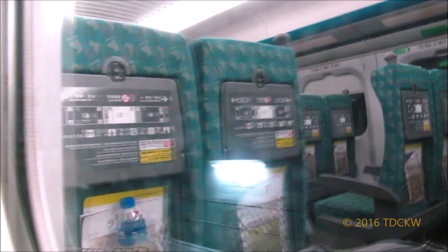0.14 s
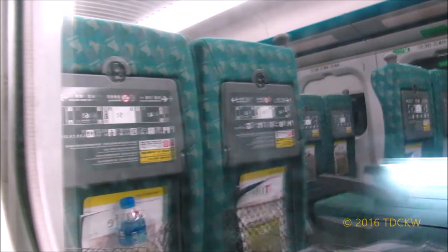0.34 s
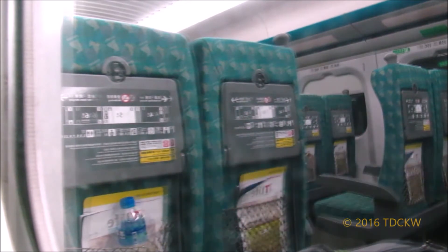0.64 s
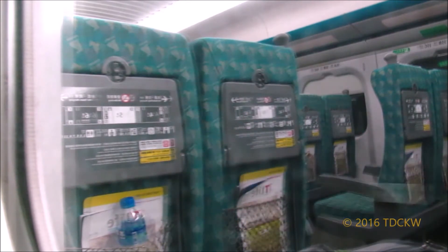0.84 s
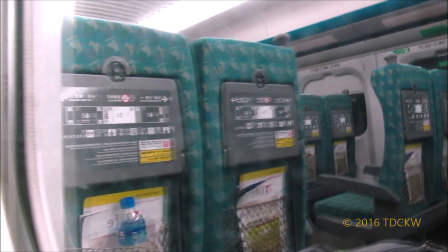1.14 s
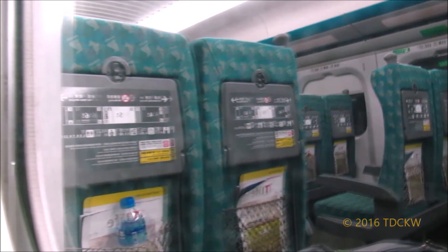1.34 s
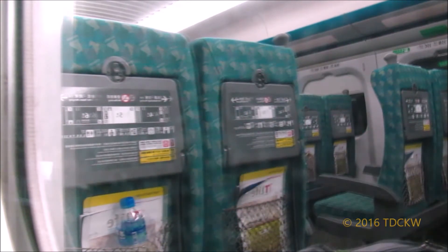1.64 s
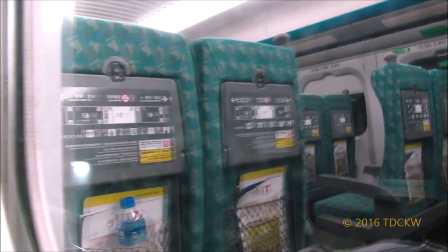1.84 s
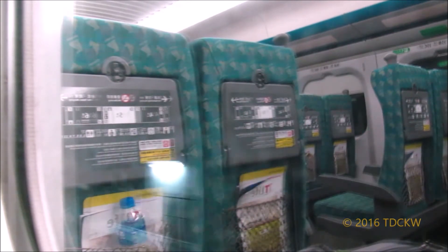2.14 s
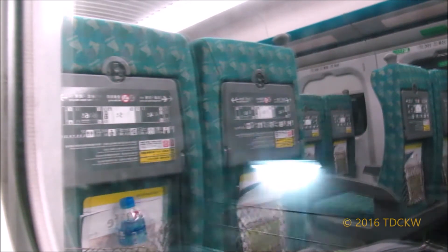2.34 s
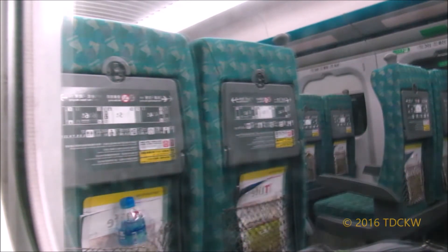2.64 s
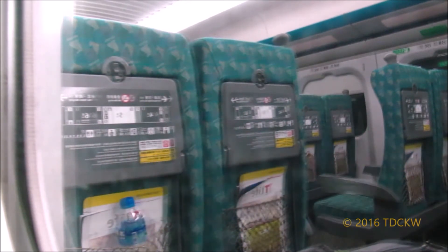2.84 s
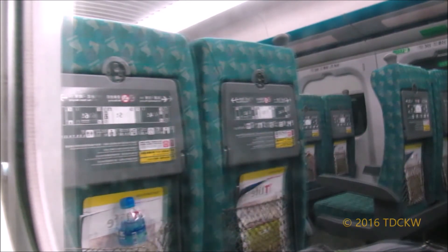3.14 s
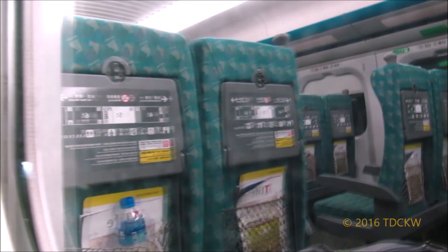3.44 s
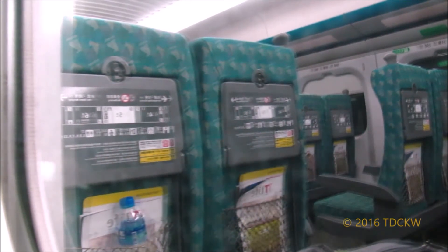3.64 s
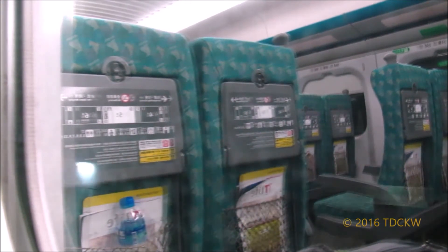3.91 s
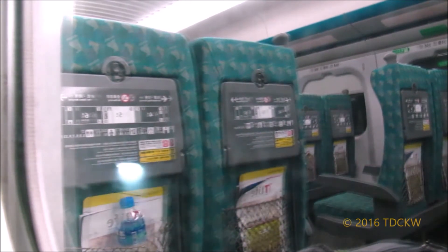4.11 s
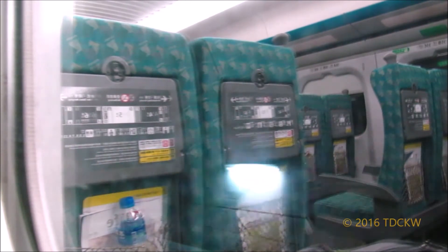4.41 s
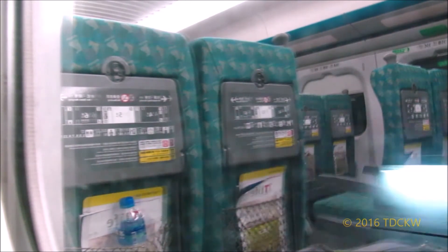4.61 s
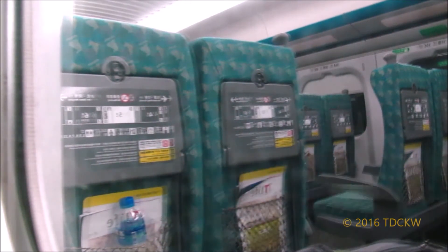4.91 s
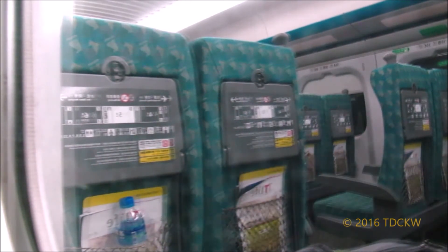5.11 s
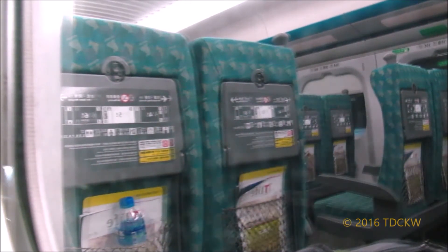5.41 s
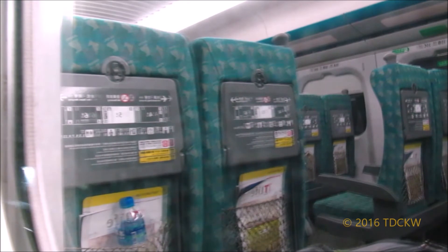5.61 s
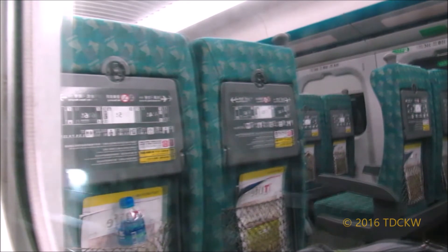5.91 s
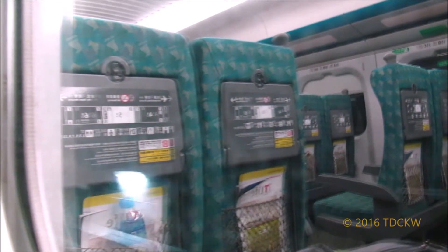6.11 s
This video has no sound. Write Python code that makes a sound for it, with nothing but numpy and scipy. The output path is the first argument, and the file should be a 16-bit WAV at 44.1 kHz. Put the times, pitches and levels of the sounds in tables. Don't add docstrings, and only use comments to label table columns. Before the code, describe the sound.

Continuous train interior noise from start to end, with no distinct events. Bassy wheel and rail rumble fills the car, a wavering hum-like whine sings steadily above it, and muffled tunnel wind churns behind. Faint panel resonances and soft vent hiss complete the bed. The low-quality compressed pickup keeps losing its high end for split seconds, leaving faint glassy chirps.

```python
import sys
import numpy as np
from scipy import signal
from scipy.io import wavfile
from scipy.ndimage import uniform_filter1d

SR = 44100
rng = np.random.default_rng(int(sys.argv[2]) if len(sys.argv) > 2 else 0)


def volts_from_db(level):
    exponent = np.asarray(level, float) / 20
    return 10 ** exponent


def to_wav(s):
    ch = np.atleast_2d(s).T
    pcm = np.round(np.clip(ch, -1, 1) * 32767)
    wavfile.write(sys.argv[1], SR, pcm.astype(np.int16))


N = 276142

# f/Hz, level/dB per Hz
RUMBLE = [(7.1, -39.5), (12, -7.5), (27, -16), (48, -1), (65, -1), (86, -8), (117, -0.5), (149, -6),
          (240, -4), (289, -10), (361, -11.5), (406, -14.5), (700, -21), (910, -55), (1540, -120)]
# t/s, whine level/dB
LOAD = [(0.0, -24), (0.31, -26.5), (0.89, -23), (2.21, -24), (3.43, -21), (3.56, -28), (3.68, -23),
        (4.5, -22), (4.69, -25.5), (5.3, -22), (5.61, -25.5), (6.26, -22.5)]
# multiple of the tooth rate, level/dB against the whine, width/Hz, sideband fall/dB per step
GEAR = [
    (1, -10, 8.8, 2),
    (2, -31.5, 12, 0.6),
]
# t/s, level/dB rms
AXLE = [(0.0, -16), (0.03, -22.5), (3.52, -26), (3.64, -60), (3.7, -33.5), (4.97, -25), (5.28, -40),
        (5.77, -20.5), (5.86, -46), (6.26, -25.5)]
# t/s, level/dB rms
MAINS = [(0.0, -32), (0.14, -24.5), (1.46, -25.5), (1.51, -43), (1.6, -19.5), (2.0, -43), (2.35, -22.5),
         (2.74, -36), (2.81, -25.5), (5.53, -28.5), (5.6, -21), (6.26, -25.5)]
# f/Hz, level/dB rms, width/Hz
PANELS = [
    (29.7, -32, 8.5),
    (99.1, -35, 2.2),
    (176.7, -37, 8.3),
    (232.3, -34.5, 21.4),
    (258.2, -38, 19),
    (363, -40.5, 8.5),
    (2580, -54, 27),
]
# f/Hz, level/dB per Hz
ROAR = [(350, -17.5), (520, -9.5), (700, -13), (1000, -13.5), (1300, -16), (1780, -13.5), (1950, -18.5),
        (2600, -20.5), (2850, -25), (3500, -29.5), (4000, -37), (4300, -38.5), (5200, -64)]
# f/Hz, level/dB per Hz
HISS = [(2500, -43.5), (3600, 0.5), (4200, -2.5), (5000, -3), (6200, -4.5), (7400, -3), (8200, -2.5),
        (9200, -3.5), (10300, -7), (11500, -14.5), (13000, -23.5), (14300, -26), (15000, -38), (15800, -43)]
# f/Hz, width/Hz,
# level/dB against the hiss
SLOTS = [(8580, 180, -16), (8670, 177, -17), (3006, 90, -7.5), (3473, 90, -12.5), (3740, 80, -13.5),
         (4020, 60, -15)]
# t/s, level/dB over the hiss
PUFFS = [
    (0.799, 3.5),
    (1.2, 3.5),
    (1.62, 2.5),
    (4.045, 5),
]
# f/Hz, level/dB over the mean of that bin
SNAP_STEP = [(900, -25), (1080, -6), (1220, 3), (1450, -4), (2700, -3), (3200, 3.5), (3500, 2.5),
             (4050, 2.5), (4300, 7.6), (8300, 7), (8600, 4.5), (9000, 7), (10500, 8), (11500, 20)]
NICKS = [.163, .217, .26, .418, .473, .927, 1.545, 1.652, 1.695, 2.953, 3.21, 3.481, 3.588, 3.7, 3.78,
         3.875, 3.909, 4.127, 4.738, 4.792, 4.877, 4.929, 5.002, 5.279, 5.423, 5.748, 5.795, 5.825, 6.257]
BLANKS = [.109, .557, .663, .961, 1.004, 1.109, 1.497, 2.186, 2.287, 2.334, 2.701, 2.881, 2.988, 3.052,
          3.086, 3.171, 3.308, 4.003, 4.164, 4.278, 4.353, 4.548, 5.15, 5.326, 5.465, 5.603, 5.978, 6.115]
# centre t/s, core/ms, treble level/dB left in the core
STRETCHES = [(.315, 12, -16), (.595, 18, -13), (.764, 8, -14), (1.084, 9, -13), (1.585, 6, -13),
             (1.73, 18, -30), (1.777, 8, -15), (1.858, 19, -25), (2.124, 18, -38), (2.406, 4, -15),
             (2.434, 6, -16), (2.503, 28, -28), (2.587, 38, -38), (2.658, 11, -12), (3.348, 15, -14),
             (3.397, 8, -14), (3.623, 11, -14), (3.75, 9, -16), (3.803, 10, -16), (3.945, 18, -25),
             (4.487, 28, -38), (4.758, 4, -16), (5.04, 8, -16), (5.077, 13, -18), (5.501, 8, -14),
             (5.54, 18, -25), (5.709, 17, -18), (5.906, 9, -14), (6.073, 24, -17)]
# centre t/s, f/Hz, level/dB rms
STRAYS = [(.218, 7435, -52), (.255, 8800, -50.5), (.26, 7700, -48), (.312, 6375, -53), (.589, 4605, -53),
          (1.001, 4865, -52), (1.072, 8530, -53), (1.548, 10185, -54), (1.589, 4175, -50),
          (2.953, 5120, -54), (3.084, 6810, -54), (3.357, 6486, -54), (3.397, 8600, -56),
          (3.583, 8565, -52), (3.629, 8690, -52), (3.701, 7135, -52), (3.741, 6850, -48),
          (3.741, 6650, -49), (3.753, 8140, -48), (3.779, 9180, -53), (3.805, 10080, -55),
          (3.876, 7465, -59), (3.936, 8640, -58), (4.272, 9400, -55), (5.425, 5535, -52),
          (5.506, 7555, -52), (5.608, 8500, -52), (5.702, 8600, -52), (5.907, 8485, -53),
          (5.978, 8660, -55)]

RUMBLE_DB, ROAR_DB, AIR_DB = -22, -31.5, -48
MESH_HZ, SHAFT_HZ = 860, 36.28
CASING_HZ, CASING_WIDTH_HZ, CASING_DB = 866.2, 121, -1.5
CORE_HZ, CORE_WANDER_HZ, CORE_DB = 862.6, 3.944, -31.5
CORE_SLOPE = 2
AXLE_HZ, MAINS_HZ, HUM_WANDER_HZ = 59.53, 120.9, 0.44
SPLIT_HZ, BLOCK_S = 4200, 512 / 48000
NICK_FADE_MS, BLOCK_FADE_MS = 11.3, 21
FAINT_DB, FAINT_SPREAD_DB, FAINT_LOW_HZ, FAINT_HIGH_HZ = -58, 1.5, 4550, 9900
EMPTY_DB = -35
SLOT_SHARE, CORE_MS_PER_STRAY = .25, 14


def evened(x):
    return x / np.sqrt(np.mean(x ** 2) + 1e-20)


def read(points, hz):
    f, value = np.transpose(points)
    return np.interp(np.log(hz + 1), np.log(f + 1), value)


def level_over_time(rows):
    t, db = np.transpose(rows)
    return np.interp(np.arange(N) / SR, t, db)


def add(mix, s, sound):
    start = max(round(s * SR) - len(sound) // 2, 0)
    part = mix[start:][:len(sound)]
    part += sound[:len(part)]


def drift(per_s):
    t = np.arange(0, N + 100, 100) / SR
    rates = np.geomspace(per_s / 10, per_s, 10)
    slow = sum(np.sin(2 * np.pi * (f * t + rng.random())) for f in rates)
    return evened(np.interp(np.arange(N) / SR, t, slow))


def fuzzy(hz, width):
    real, imaginary = rng.standard_normal((2, N))
    r = np.exp(-np.pi * np.clip(width, .3, 2000) / SR)
    once = signal.lfilter([1 - r], [1, -r], real + 1j * imaginary)
    slow = signal.lfilter([1 - r], [1, -r], once)
    carrier = np.exp(2j * np.pi * hz * np.arange(N) / SR)
    return evened((slow * carrier).real)


def wandering_tone(hz, wander_hz, db):
    turns = np.cumsum(hz + wander_hz * drift(per_s=3.)) / SR
    return np.sqrt(2) * volts_from_db(db) * np.sin(2 * np.pi * turns)


def wash(spectrum, patchy_db, flicker_db, size):
    frames, hz = 4 * N // size + 5, np.fft.rfftfreq(size, 1 / SR)
    a, b, patches = rng.standard_normal((frames, len(hz), 3)).T
    patches = uniform_filter1d(patches, size=10, axis=0)
    patches = evened(uniform_filter1d(patches, size=8, axis=1))
    flicker = evened(uniform_filter1d(rng.standard_normal(frames), size=4))
    level_db = read(spectrum, hz)[:, None] + patchy_db * patches + flicker_db * flicker
    z = (a + 1j * b) * volts_from_db(level_db)
    return evened(signal.istft(z, nperseg=size, noverlap=3 * size // 4)[1][:N])


def rail_rumble():
    return volts_from_db(RUMBLE_DB) * wash(RUMBLE, patchy_db=0.0, flicker_db=1.2, size=4096)


def gear_whine():
    out = volts_from_db(CASING_DB) * fuzzy(CASING_HZ, CASING_WIDTH_HZ)
    for multiple, db, width, fall_db in GEAR:
        for step in range(-3, 4):
            hz = round(multiple) * MESH_HZ + step * SHAFT_HZ
            spread = width * (1 + 0.65 * abs(step))
            out = out + volts_from_db(db - fall_db * abs(step)) * fuzzy(hz, spread)
    return volts_from_db(level_over_time(LOAD) - 0.03) * out


def tooth_tone():
    load_db = level_over_time(LOAD)
    level_db = CORE_DB + CORE_SLOPE * (load_db - load_db.mean())
    return wandering_tone(CORE_HZ, CORE_WANDER_HZ, level_db)


def axle_and_mains_hum():
    axle = wandering_tone(AXLE_HZ, HUM_WANDER_HZ, level_over_time(AXLE) - 1.5)
    mains = wandering_tone(MAINS_HZ, HUM_WANDER_HZ, level_over_time(MAINS) - 1.5)
    return axle + mains


def panel_ring():
    return sum(volts_from_db(db) * fuzzy(hz, width) for hz, db, width in PANELS)


def tunnel_roar():
    return volts_from_db(ROAR_DB) * wash(ROAR, patchy_db=0.75, flicker_db=0.27, size=1024)


def vent():
    t, level_db = np.arange(N) / SR, np.full(N, AIR_DB)
    for s, db in PUFFS:
        rise = np.exp(np.minimum(t - s, 0) / 0.024)
        fade = np.exp(-abs(t - s) / 0.043)
        level_db = level_db + db * np.where(t < s, rise, fade)
    song = sum(volts_from_db(db) * fuzzy(hz, width) for hz, width, db in SLOTS)
    return volts_from_db(level_db) * (wash(HISS, patchy_db=1.0, flicker_db=-0.1, size=1024) + song)


def scene():
    rolling_and_air = rail_rumble() + tunnel_roar() + vent()
    hums = panel_ring() + axle_and_mains_hum() + tooth_tone()
    return (rolling_and_air + hums + gear_whine())[None]


def gaps():
    nicks = [(s, 0, NICK_FADE_MS, -30) for s in NICKS]
    blanks = [(s, 0, BLOCK_FADE_MS, -30) for s in BLANKS]
    return nicks + blanks + [(s, core_ms, BLOCK_FADE_MS, left_db) for s, core_ms, left_db in STRETCHES]


def starved(x, size=1500):
    window = dict(window=signal.windows.cosine(size), nperseg=size)
    hz, _, z = signal.stft(x, SR, **window)
    usual = np.sqrt(np.mean(abs(z) ** 2, axis=1))
    step = (usual * volts_from_db(read(SNAP_STEP, hz)))[:, None]
    snapped = step * np.where(abs(z) > step, np.floor(abs(z) / step) + .75, 0)
    return signal.istft(snapped * np.exp(1j * np.angle(z)), SR, **window)[1][:N]


def full_share(stretch):
    share, t = np.ones(N), np.arange(N) / SR
    for s, core_ms, fade_ms, left_db in gaps():
        near = slice(max(round((s - .1) * SR), 0), round((s + .1) * SR))
        away = (abs(1000 * (t[near] - s)) - core_ms / 2 - 1) / (stretch * fade_ms)
        fade = np.sin(np.pi / 2 * np.clip(away, 0, 1))
        share[near] *= np.maximum(fade, volts_from_db(left_db))
    return share


def strays(blocks=3.2):
    out, t, rows = np.zeros(N), np.arange(round(blocks * BLOCK_S * SR)) / SR, list(STRAYS)
    slot_hz, slot_width, _ = SLOTS[1]
    for s, core_ms, _, left_db in gaps():
        for when, kind, pitch, size in rng.random((1 + round(core_ms / CORE_MS_PER_STRAY), 4)):
            hz = FAINT_LOW_HZ + (FAINT_HIGH_HZ - FAINT_LOW_HZ) * pitch
            if kind < SLOT_SHARE or left_db < EMPTY_DB:
                hz = slot_hz + slot_width * (2 * pitch - 1)
            centre = s + (when - .5) * (core_ms + 10) / 1000
            rows.append((centre, hz, FAINT_DB + FAINT_SPREAD_DB * 2 * (2 * size - 1)))
    swell = np.sin(np.pi * t / t[-1])
    for (s, hz, db), turn in zip(rows, rng.random(len(rows))):
        add(out, s, np.sqrt(2) * volts_from_db(db) * swell * np.sin(2 * np.pi * (hz * t + turn)))
    return out


def band_limit(x):
    return signal.sosfilt(signal.butter(12, 15770, fs=SR, output="sos"), x)


def record(dry):
    coarse = starved(dry[0])
    detail = dry[0] - coarse
    low = signal.oaconvolve(detail, signal.firwin(255, SPLIT_HZ, fs=SR), "same")
    high = signal.oaconvolve(coarse, signal.firwin(255, SPLIT_HZ, fs=SR, pass_zero=False), "same")
    share = full_share(stretch=1.05)
    long_share = full_share(stretch=1.5) ** 2
    thinned = dry[0] - (1 - long_share) * low - (1 - share) * (detail - low)
    mix = thinned + (share - long_share) * high + strays()
    return band_limit(mix[None])


dry = scene()
out = record(dry)
to_wav(out)
```